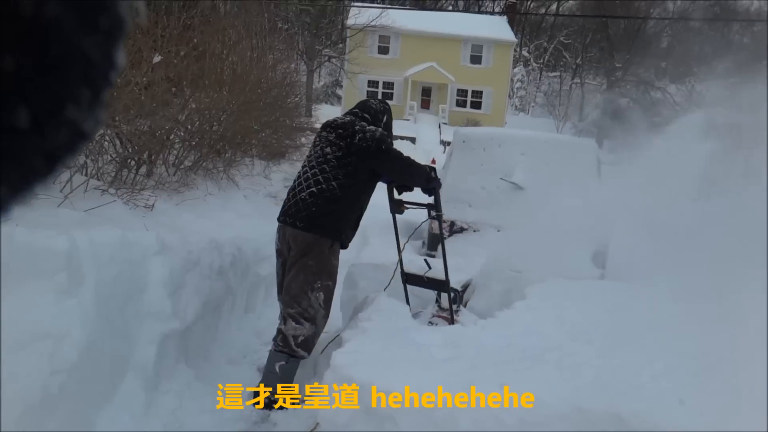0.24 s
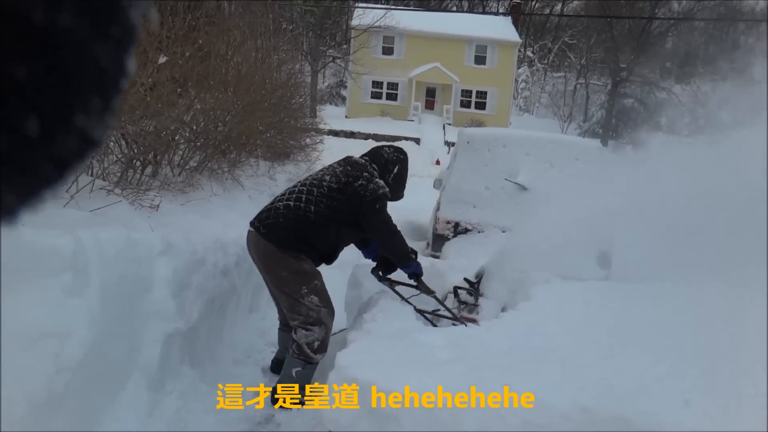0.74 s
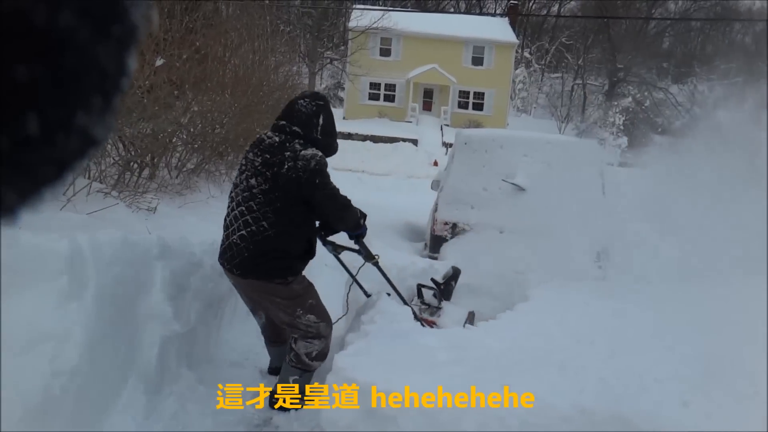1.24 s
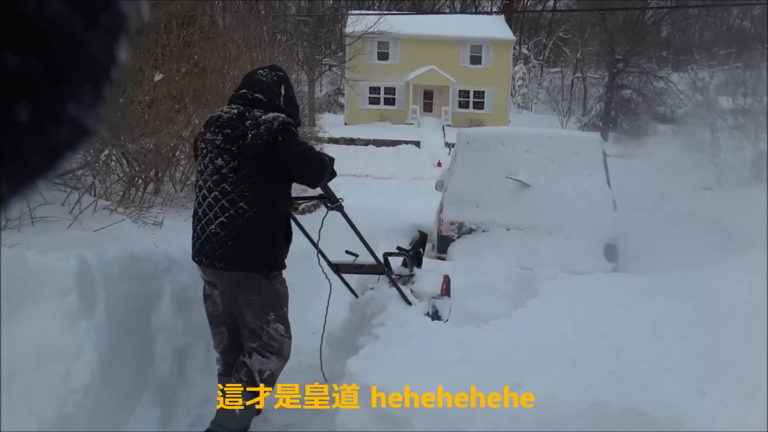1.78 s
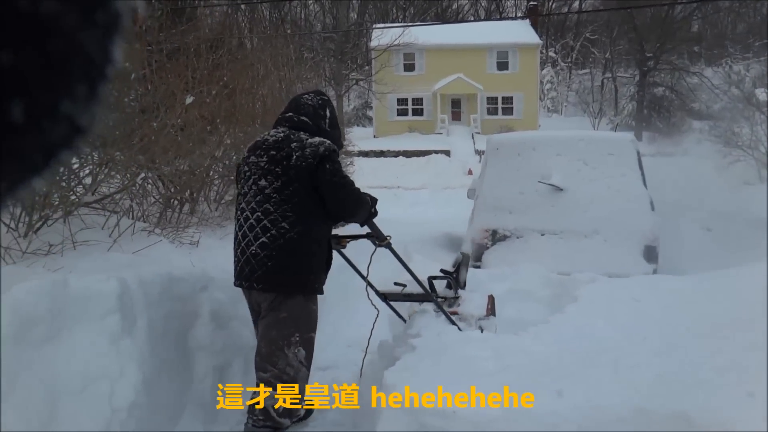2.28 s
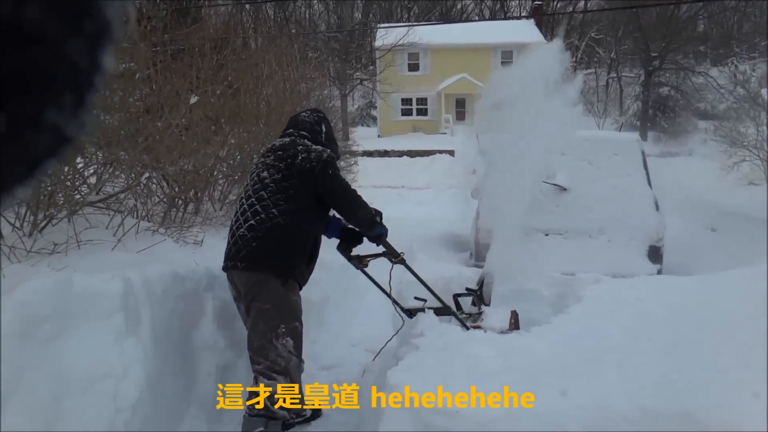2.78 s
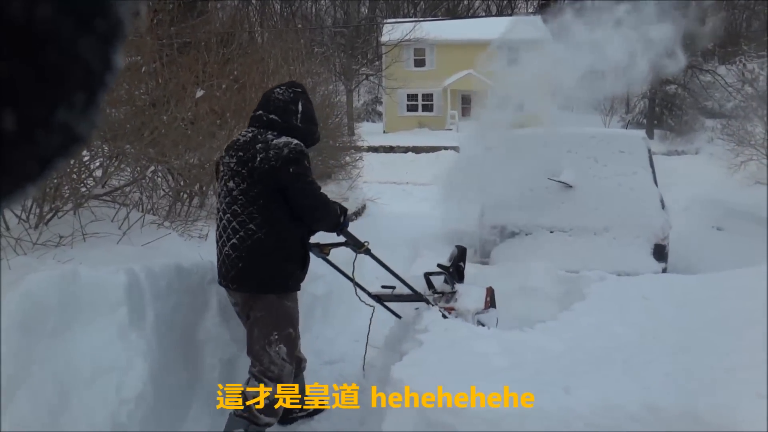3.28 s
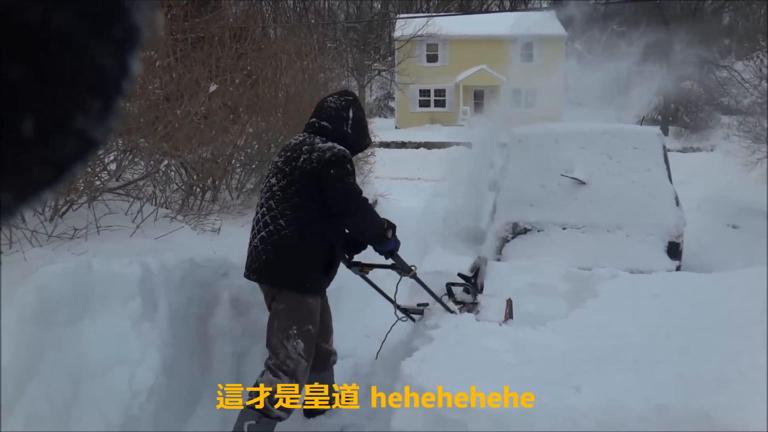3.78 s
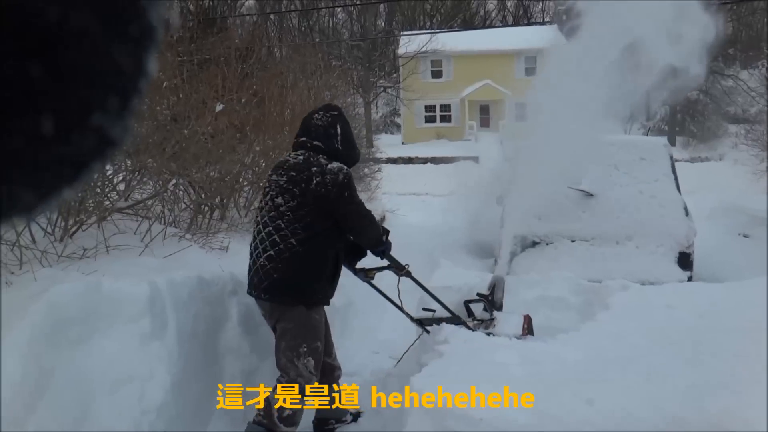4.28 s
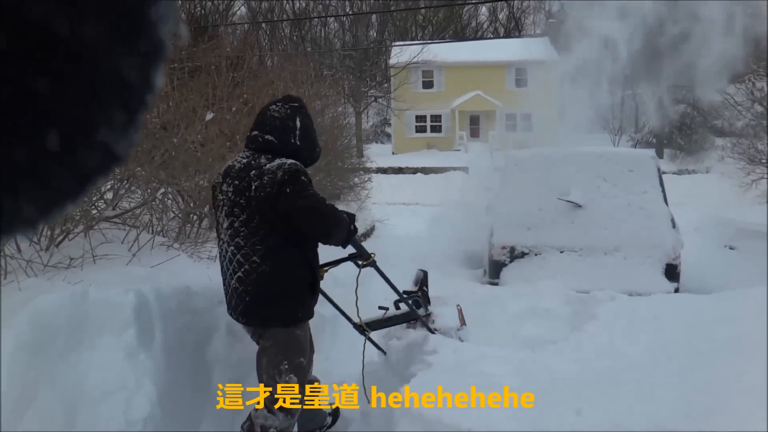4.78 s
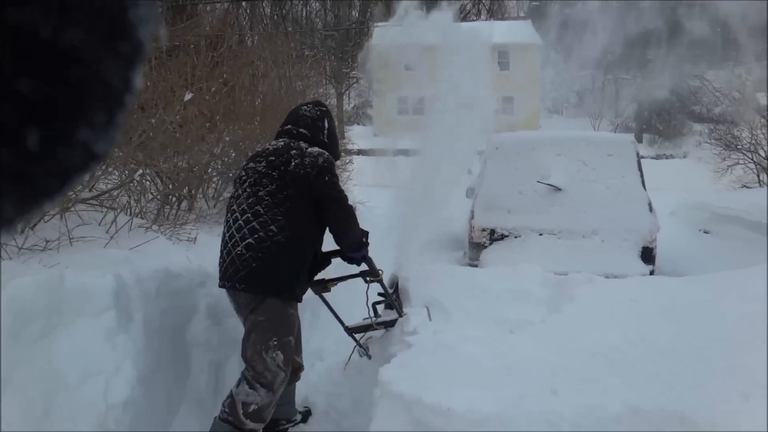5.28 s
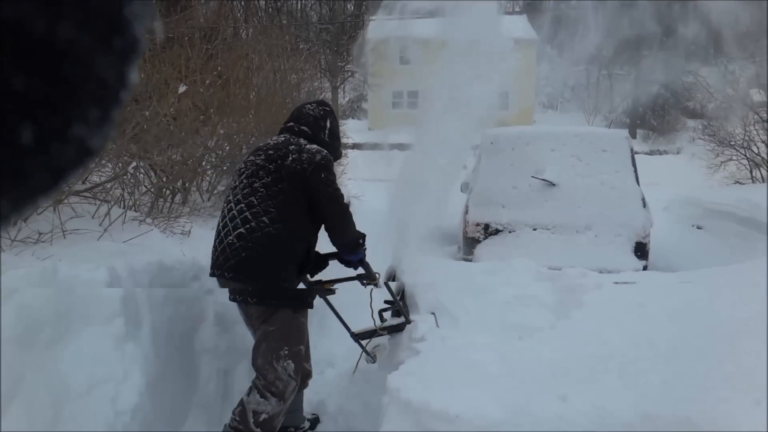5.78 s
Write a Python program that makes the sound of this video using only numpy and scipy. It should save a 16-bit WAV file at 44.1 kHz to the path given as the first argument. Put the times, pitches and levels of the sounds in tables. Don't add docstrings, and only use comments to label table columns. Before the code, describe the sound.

Outdoors, a few metres from the microphone, an electric snow blower starts already running: a bright rush of air and snow with a high fan whine. From about 0.2 s it bites deep; pitch falls, paddles groan and thud, and ice lumps and grit crackle densely on the ringing metal chute until 0.8 s. The airflow sinks, and a thin belt squeal slips in at 0.75-0.9 s. From 1 s the motor climbs back, reaching a loud steady roar and whine near 1.8 s. A slight sag comes around 2.8 s with a knock or two, harder taps near 3.1 s, then full rush at 3.5 s. Around 3.9-4.3 s a second bite brings grit, knocks, thuds and a pitch dip, with a low wind puff. The rush stays weaker, bogs down again from 5.1 s with faint ticking, and stops dead near 5.5 s, leaving silence.

```python
import sys
import numpy as np
from scipy import signal
from scipy.fft import rfft, irfft
from scipy.io import wavfile

SR = 44100
rng = np.random.default_rng(int(sys.argv[2]) if len(sys.argv) > 2 else 0)


def wav_record(signal):
    frames = np.transpose(np.atleast_2d(signal))
    bounded = np.clip(frames, -1, 1)
    quanta = np.round(bounded * 32767).astype(np.int16)
    wavfile.write(sys.argv[1], SR, quanta)


def amplitude_ratio(level_db):
    exponent = np.asarray(level_db, float) / 20
    return 10 ** exponent


N = 266672

PADDLES_PER_TURN = 0.18
FREE_HZ = 336.4
LOUD_DB = -14


def rms_one(x):
    return x / np.sqrt(np.mean(x ** 2) + 1e-20)


def in_time(rows):
    s, *columns = np.transpose(rows)
    return [np.interp(np.arange(N) / SR, s, column) for column in columns]


def at_hz(points, hz):
    point_hz, value = np.array(points)[:, 0], np.array(points)[:, 1]
    return np.interp(np.log(hz), np.log(point_hz), value)


def drift(rate):
    r = np.exp(-80 * np.pi * rate / SR)
    steps = rng.standard_normal(N // 40 + 2002)
    slow = signal.lfilter([1], [1, -2 * r, r * r], steps)[2000:]
    return np.interp(np.arange(N) / 40, np.arange(len(slow)), rms_one(slow))


def bouts(rows, rise, fall, rest_db):
    t = np.arange(N) / SR
    for start, end, db in rows:
        below_db = np.maximum(np.maximum(rise * (start - t), fall * (t - end)), 0)
        rest_db = np.maximum(rest_db, db - below_db)
    return rest_db


def ring(clicks, hz, t60):
    r, w = amplitude_ratio(-60 / (t60 * SR)), 2 * np.pi * hz / SR
    return signal.lfilter([0, np.sin(w)], [1, -2 * r * np.cos(w), r * r], clicks + 1e-18)


# (frequency [Hz], likeness [0-1])
LIKENESS = [(50, .8), (150, .8), (300, .95), (550, .993), (1000, .955), (2000, .989), (8000, .987),
            (14000, .995)]


def coloured(spectrum, peaks, low_hz, high_hz, patchy_db):
    hz = np.arange(N // 2 + 1) * SR / N + 1e-3
    db = at_hz(spectrum, hz)
    for peak_hz, width_hz, peak_db in peaks:
        db = db + peak_db / (1 + (2 * (hz - peak_hz) / width_hz) ** 2)
    alike = np.clip(at_hz(LIKENESS, hz), 0, 1)
    mid, side = rfft(rng.standard_normal((2, N))) * amplitude_ratio(db)
    pair = np.sqrt(1 + alike) * mid + np.sqrt(1 - alike) * side * [[1], [-1]]
    octave, out = np.log2(hz / low_hz), 0
    together = drift(24)
    for k in range(int(2 * np.log2(high_hz / low_hz)) + 1):
        share = np.cos(np.pi / 2 * np.clip(2 * octave - k, -1, 1))
        band = irfft(pair * share ** 2, N)
        out = out + amplitude_ratio(patchy_db * (0.48 * together + drift(25))) * band
    return rms_one(out)


# (frequency [Hz], density [dB per Hz])
WIND = [(12, -45), (20, -14), (32, -12.5), (48, -7.5), (110, 3), (140, -31), (240, -120)]
# (time [s], level [dB])
GUSTS = [(.32, -53), (.84, -48), (1.37, -47.5), (1.57, -48), (1.89, -45.5), (2.15, -42.5), (2.33, -49),
         (4.0, -38), (4.3, -50), (4.79, -59), (5.27, -51)]


def wind(air_db):
    breeze_db = -63 + 0.55 * (air_db - LOUD_DB)
    gust_db = bouts([(s, s, db) for s, db in GUSTS], 90.5, 131, breeze_db)
    return amplitude_ratio(gust_db - 2.5) * coloured(WIND, [], 22, 90, patchy_db=4.0)


# (time [s], level [dB])
AIRFLOW = [(0, -16.5), (.1, -17.5), (.38, -22.5), (.59, -26), (.63, -34), (.82, -36.5), (1.25, -24),
           (1.5, -19.5), (1.76, -15), (2.5, -17), (2.9, -21), (3.47, -14.5), (3.72, -16.5), (4.29, -27),
           (4.35, -32.5), (4.85, -27.5), (5.3, -38.5), (5.49, -47)]


def airflow():
    return in_time(AIRFLOW)[0]


# (time [s], shaft speed it would take away [Hz])
DRAG = [(0, 15), (.09, 14), (.26, 259), (.41, 161), (.72, 210), (.92, 88), (.99, 0), (2.3, 0), (2.62, 21),
        (2.77, 70), (2.97, 0), (3.7, 0), (4.07, 38), (4.25, 103), (4.34, 0), (5.01, 2), (5.27, 196),
        (5.5, 226)]


def load():
    inertia_s, full_bite_hz = 0.238, 91
    drag_hz, = in_time(DRAG)
    keep = np.exp(-1 / (inertia_s * SR))
    lost_hz = signal.lfilter([1 - keep], [1, -keep], drag_hz, zi=[drag_hz[0]])[0]
    shaft_hz = FREE_HZ - lost_hz
    turns = np.cumsum(shaft_hz * (1 + 0.001 * drift(30))) / SR
    return shaft_hz, np.tanh(drag_hz / full_bite_hz), turns


# (time [s], peak level [dB], knock pitch [Hz], crack over peak [dB])
LUMPS = [(0.2305, -1, 2820, -16.5), (0.2546, -2.5, 2820, -21.5), (0.2585, -2, 4330, -24),
         (0.2642, 0, 4350, -22), (0.2724, -6, 6050, -11), (0.2993, -4.5, 6230, -13.5),
         (0.322, -1.5, 2830, -26.5), (0.3374, -6.5, 2820, -18.5), (0.3519, -6.5, 6160, -14.5),
         (0.3758, -9, 6130, -14.5), (0.4015, -6, 2820, -20), (0.4144, -4.5, 8940, -20),
         (0.4267, -1, 2790, -23), (0.4542, -5, 3180, -23), (0.4706, -3.5, 9170, -17.5),
         (0.4893, -5.5, 2840, -21), (0.517, -15.5, 9500, -21), (0.5587, -12, 6180, -17),
         (0.5758, -8, 2230, -12), (0.601, -11.5, 2790, -14), (0.6116, 1.5, 3260, -33),
         (0.6267, -12.5, 6200, -23), (0.6476, -17, 6170, -28), (0.6784, -14.5, 2000, -28),
         (0.7126, -10, 2330, -16), (0.7755, -14, 6000, -21), (0.9311, -19, 3480, -19),
         (0.9929, -18, 3900, -18), (1.057, -22, 9000, -17), (1.228, -6.5, 3150, -27.5)]
LATE_LUMPS = [(2.115, -16, 4030, -20), (2.7122, -8, 3190, -17), (3.0592, -6, 4070, -17),
              (3.167, -2, 3380, -20), (3.8709, -13, 3990, -22), (4.023, -4, 3340, -19),
              (4.0644, -9.5, 10100, -20), (4.1794, -11, 3520, -25), (4.333, -17, 5100, -14),
              (4.3335, -12, 14500, -18), (4.3568, -19, 5990, -16), (5.2545, -23, 10700, -22),
              (5.2704, -23, 10700, -22), (5.3016, -25, 10400, -18), (5.3158, -21, 10600, -22),
              (5.3264, -22, 6010, -22), (5.349, -22, 10600, -21), (5.3652, -22, 4120, -24),
              (5.3704, -20, 10700, -23), (5.3852, -22, 6110, -22), (5.3984, -23, 10500, -19),
              (5.439, -26, 6090, -21), (5.4704, -27, 10500, -16)]
# (start [s], end [s], level [dB], ring of the thin upper chute [dB])
GRIT = [
    (.25, .55, -24, 0),
    (.6, 0.775, -32, -10),
    (.88, 1.06, -45, -8),
    (3.87, 4.06, -33.5, -2),
    (5.305, 5.5, -44.5, -14),
]
# (frequency [Hz], level [dB], decay t60 [s])
CHUTE = [(2820, -6, 0.027), (4370, -10.5, .012), (6050, -18, 0.0203), (6196, -1.5, .025), (7360, -3, .012),
         (8200, -11, .006), (9000, -2.5, 0.007), (9530, 2.5, .008), (10400, -5.5, 0.0076),
         (11500, -3.5, 0.014), (14200, -3.5, 0.009), (15200, -14, .006)]


def ice(air_db):
    lumps = np.array(list(LUMPS) + list(LATE_LUMPS))
    at = np.round(lumps[:, 0] * SR).astype(int)
    ring_db = np.repeat([-6, -15], [len(LUMPS), len(LATE_LUMPS)])

    stray_db, thin_rest_db = air_db - 28.5, -12.5
    grit_db = bouts([row[:3] for row in GRIT], 151.5, 150, stray_db)
    thin_db = bouts([(start, end, db) for start, end, _, db in GRIT], 151.5, 150, thin_rest_db)
    hits = rng.random(N) < 900 / SR
    grit = hits * amplitude_ratio(grit_db + 3.5 * np.minimum(rng.exponential(1, N), 4))

    out = np.zeros(N)
    spread = rng.standard_normal((len(at), len(CHUTE)))
    for k, (hz, level_db, t60) in enumerate(CHUTE):
        clicks = grit * amplitude_ratio(4.0 * rng.standard_normal(N))
        clicks[at] += amplitude_ratio(lumps[:, 1] + ring_db + 3.4 * spread[:, k])
        upper_db = thin_db * (hz > 11000)
        out += amplitude_ratio(level_db - 10.0 + upper_db) * ring(clicks, hz, t60)

    t = np.arange(400) / SR
    burst = rng.standard_normal((len(at), 400))
    brittle = signal.butter(1, [5000, 12000], "band", fs=SR)
    for i, (_, peak_db, hz, crack_db), noise in zip(at, lumps, burst):
        crack = amplitude_ratio(crack_db + 16) * signal.lfilter(*brittle, noise) * np.exp(-t / 0.0024)
        knock = 0.5 * np.sin(2 * np.pi * hz * t) * np.minimum(t / 0.00035, 1) * np.exp(-t / 0.002)
        out[i:i + 400] += amplitude_ratio(peak_db) * (crack + knock)
    out += 1.6 * signal.lfilter(*brittle, grit)
    return out + 0.07 * np.roll(out, 37) * [[1], [-1]]


# (frequency [Hz], density [dB per Hz])
AIR = [(180, -39.5), (300, -14), (406, -13.5), (459, -12), (964, -7), (1770, -3.5), (2170, -5), (2390, -5),
       (2780, -4), (3760, 0.5), (4030, 1), (5450, -12), (8000, 0.5), (10400, -43), (17600, -120)]
# (frequency [Hz], density [dB per Hz])
SPRAY = [(7000, -4), (7530, -1.5), (7850, -3.5), (10100, -0.5), (11000, -6), (11900, -16), (13500, -17),
         (15100, -16.5), (16200, -20.5)]
# (frequency [Hz], density [dB per Hz])
THUD = [(60, -25), (100, -5), (150, -7.5), (220, 0.5), (340, 1.5), (480, -3.5), (650, -14)]
# (frequency [Hz], width [Hz], level [dB])
HOUSING = [(570, 55, 3.5), (890, 290, 3.5), (2060, 80, 1.5), (2169, 48, 7.5), (2790, 22, -1),
           (3060, 100, 1), (3386, 140, 5), (3880, 340, -6), (4550, 57, 5), (4960, 110, -1),
           (6145, 120, 3.5), (7200, 45, 0.5), (7420, 350, -5.5), (5400, 280, 3.5), (8700, 87, 3),
           (9980, 180, 1.5), (1430, 320, -2.5), (1800, 250, -6.5)]
# (time [s], level [dB])
THUMPS = [(.57, -32), (.72, -39.5), (.88, -34.5), (.94, -32), (.985, -29.5), (1.56, -36), (2.85, -31),
          (3.92, -34), (4.0, -35), (4.27, -33.5), (4.86, -41), (5.31, -38)]


def rush(turns, bite, air_db):
    boom_db = -5.5 + 0.24 * (LOUD_DB - air_db)
    tipped = np.clip((0.2 - np.arange(N) / SR) / 0.083 + 1, 0, 1)
    boom_db = boom_db - 3 * tipped
    hiss_db = -3.5 - 1.5 * bite
    thud_rest_db = air_db - 22 + 11 * bite
    thud_db = bouts([(s, s, db) for s, db in THUMPS], 200, 400, thud_rest_db) - air_db
    paddle = np.cos(2 * np.pi * (PADDLES_PER_TURN * turns + 0.049 * drift(7.2)))

    boom = amplitude_ratio(boom_db) * coloured(AIR, HOUSING, 373, 1500, patchy_db=0.0)
    air = coloured(AIR, HOUSING, 1900, 7500, patchy_db=0.73)
    hiss = amplitude_ratio(hiss_db) * coloured(SPRAY, HOUSING, 6690, 16000, patchy_db=0.72)
    thud = amplitude_ratio(thud_db + 8.6 * paddle) * coloured(THUD, [], 75, 500, patchy_db=1.5)
    return amplitude_ratio(air_db) * (amplitude_ratio(0.38 * paddle) * (boom + air + hiss) + 0.82 * thud)


# (time [s], pitch [Hz], level [dB])
SQUEAL = [
    (0, 3400, -90),
    (.7, 3400, -70),
    (.74, 3370, -42),
    (.8, 3290, -39),
    (.86, 3400, -41),
    (.91, 3550, -50),
    (.95, 3600, -90),
]


def belt():
    hz, db = in_time(SQUEAL)
    cycles = np.cumsum(hz * (1 + 0.0033 * drift(40))) / SR
    return np.sqrt(2) * amplitude_ratio(db) * np.sin(2 * np.pi * cycles)


# (multiple of shaft speed, level [dB])
HUM_ORDERS = [(.18, -18.5), (.42, -12), (1, 2), (1.225, 2), (1.7, -1.5), (2, -3), (2.45, 0.5), (3, 5),
              (24, -10.5)]
# (harmonic of paddle rate, level [dB])
BEAT = [(2, -14), (3, -4), (4, -7), (5, 0), (6, 0), (7, -4), (8, -1), (9, -2), (10, -1), (11, -3)]
# (shaft speed [Hz], level over air [dB])
BLADE_BLOOM = [(150, -28), (310, -32), (322, -16.5), (327, -9.5), (333, -7), (337, -5)]
# (start [s], end [s], level [dB])
SLOT_HEARD = [
    (.92, 1.37, -38),
    (4.04, 4.28, -38.5),
    (5.13, 5.25, -43),
]
# (harmonic of paddle rate, level [dB])
GROAN_ORDERS = [(2, -8), (4, 0)]
# (start [s], end [s], level [dB])
GROANS = [
    (.12, .2, -43),
    (5.1, 5.27, -49),
]


def motor(shaft_hz, bite, turns, air_db):
    blade_db = air_db + 0.2 * (air_db - LOUD_DB) + np.interp(shaft_hz, *np.transpose(BLADE_BLOOM))
    slot_db = bouts(SLOT_HEARD, 350, 350, air_db - 30)
    groan_db = bouts(GROANS, 250, 250, air_db - 45)
    hum_db = air_db - 23.5 + 0.12 * (LOUD_DB - air_db) - 6 * bite
    bogged = np.tanh((1 - shaft_hz / FREE_HZ) / 0.31)
    beat_db = air_db - 36 + 24 * np.minimum(bite, bogged)

    def tone(order, db, waver_db, wavers_per_s=10):
        level = np.sqrt(2) * amplitude_ratio(db + waver_db * drift(wavers_per_s))
        return level * np.sin(2 * np.pi * (order * turns + rng.random()))

    hum = sum(tone(order, hum_db + db, waver_db=2.2, wavers_per_s=3) for order, db in HUM_ORDERS)
    beat = sum(tone(k * PADDLES_PER_TURN, beat_db + db, waver_db=2.0) for k, db in BEAT)
    groan = sum(tone(k * PADDLES_PER_TURN, groan_db + db, waver_db=2.5) for k, db in GROAN_ORDERS)
    blades = tone(12, blade_db, waver_db=0.8)
    slots = tone(18, slot_db, waver_db=1.2) + tone(36, slot_db - 9, waver_db=3.0)
    gap = ring(rng.standard_normal(N), hz=2777, t60=0.16)
    whistle = amplitude_ratio(blade_db - 4.5) * rms_one(gap)
    return blades + slots + groan + hum + beat + whistle


def scene():
    air_db = airflow()
    shaft_hz, bite, turns = load()
    whine = motor(shaft_hz, bite, turns, air_db) + belt()
    dry = rush(turns, bite, air_db) + whine * amplitude_ratio([[-0.2], [0.2]]) + ice(air_db)
    echo_s, echo_gain = 0.001, 0.24
    lag = round(echo_s * SR)
    dry[:, lag:] += echo_gain * dry[:, :-lag]
    return dry / np.sqrt(1 + echo_gain ** 2) + wind(air_db)


def roll_off(x):
    return signal.sosfilt(signal.butter(12, 16500, fs=SR, output="sos"), x)


def record(dry):
    rounded = 1.3 * np.tanh(dry / 1.3)
    dull = signal.sosfilt(signal.cheby2(20, 40, 16120, fs=SR, output="sos"), rounded)
    gate = np.clip((5.486 - np.arange(N) / SR) / 0.007, 0, 1)
    return roll_off(dull * gate)


dry = scene()
out = record(dry)
wav_record(out)
```